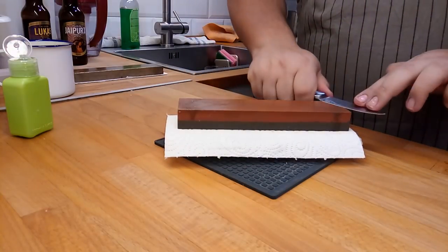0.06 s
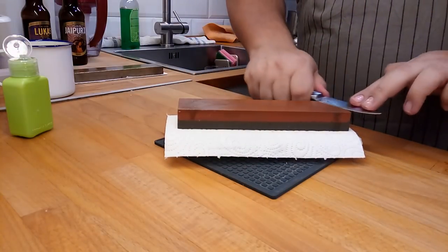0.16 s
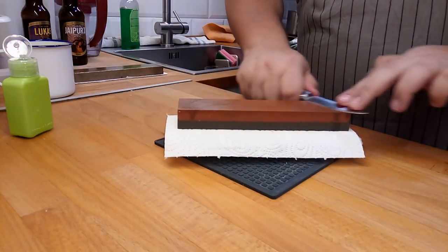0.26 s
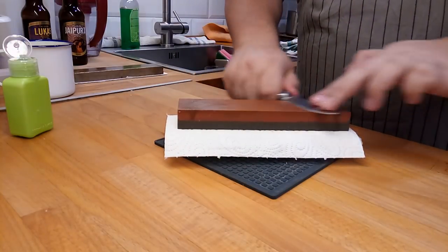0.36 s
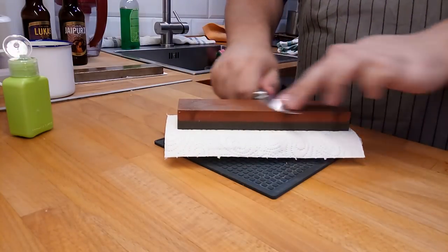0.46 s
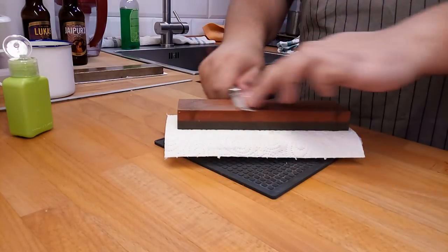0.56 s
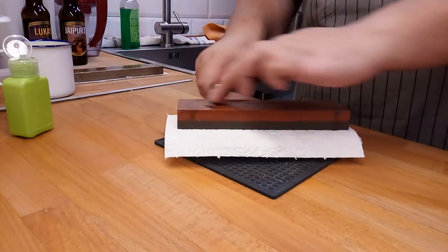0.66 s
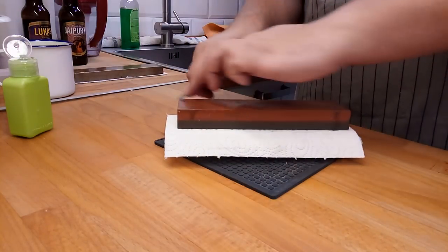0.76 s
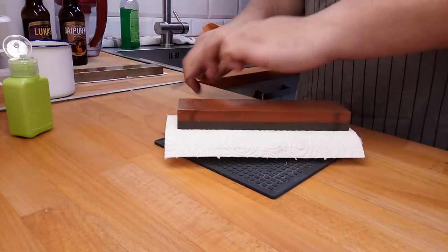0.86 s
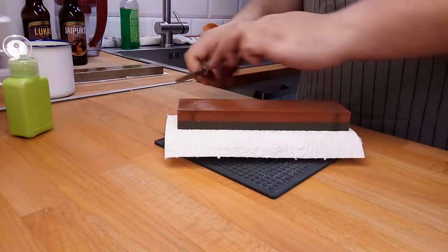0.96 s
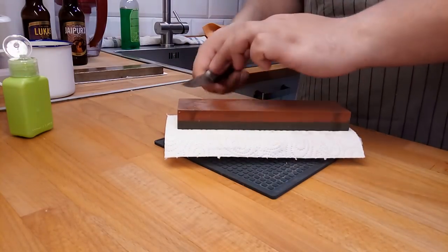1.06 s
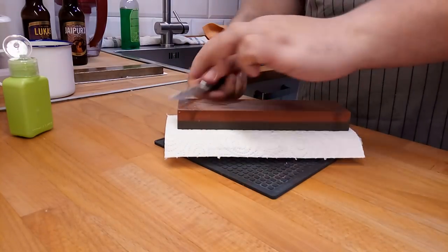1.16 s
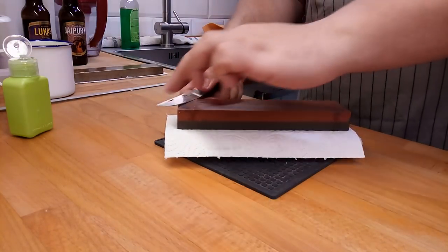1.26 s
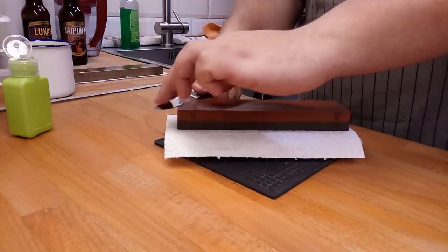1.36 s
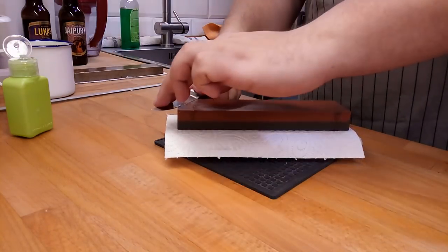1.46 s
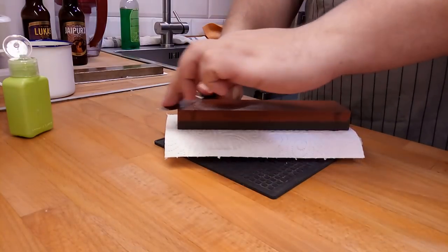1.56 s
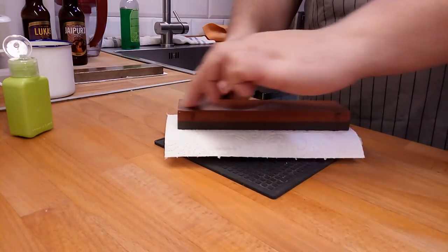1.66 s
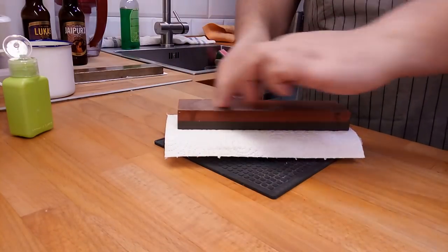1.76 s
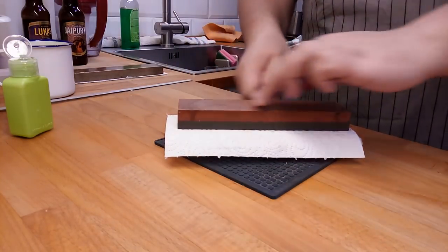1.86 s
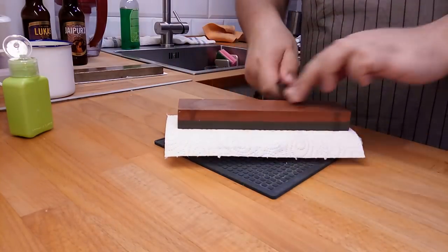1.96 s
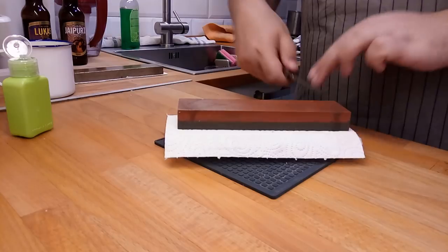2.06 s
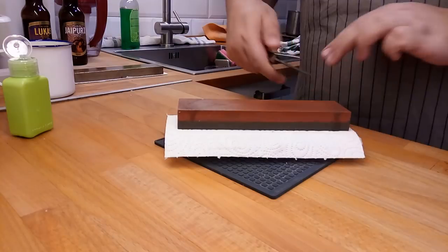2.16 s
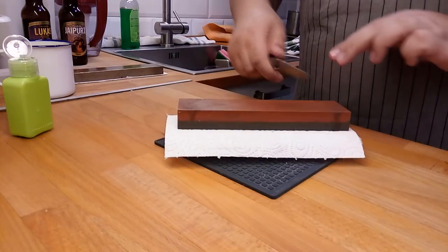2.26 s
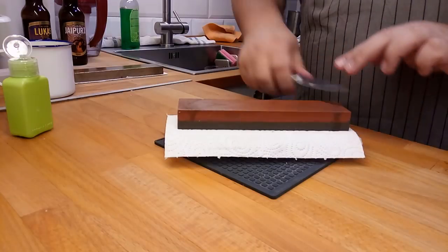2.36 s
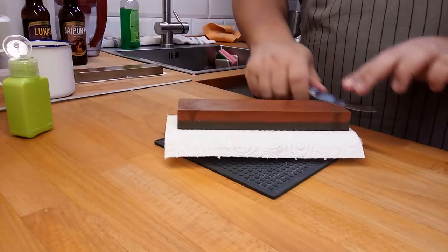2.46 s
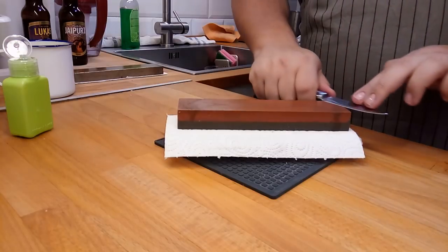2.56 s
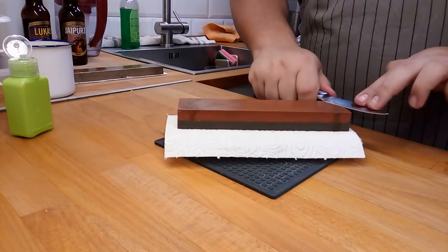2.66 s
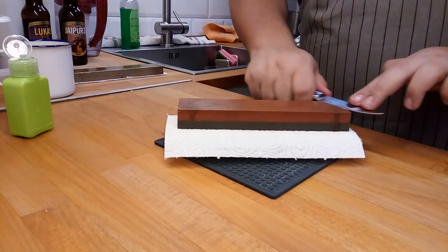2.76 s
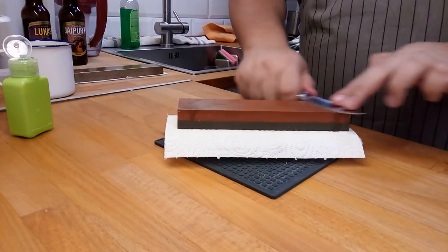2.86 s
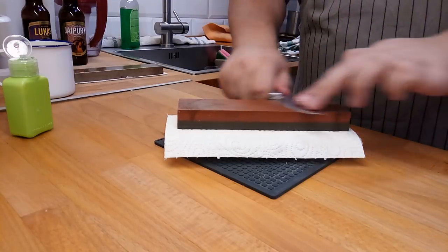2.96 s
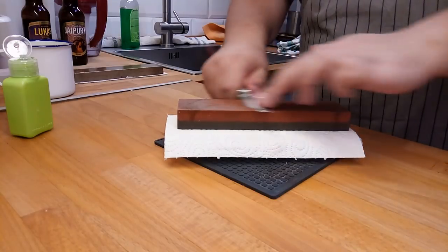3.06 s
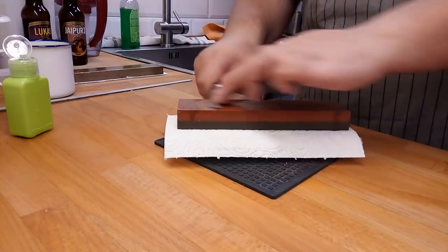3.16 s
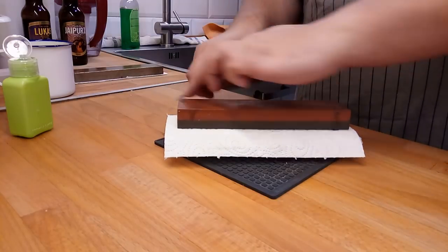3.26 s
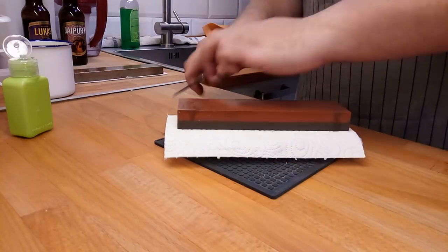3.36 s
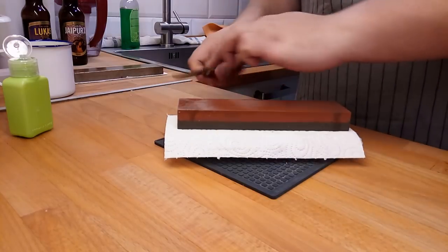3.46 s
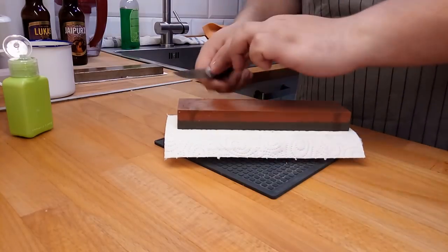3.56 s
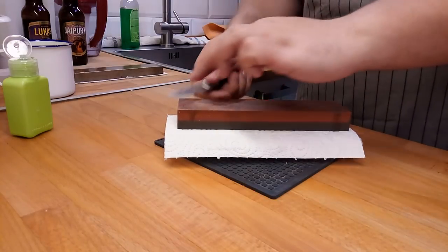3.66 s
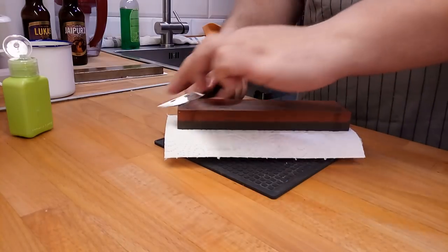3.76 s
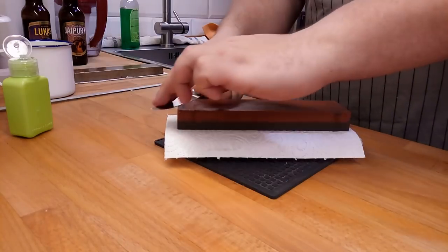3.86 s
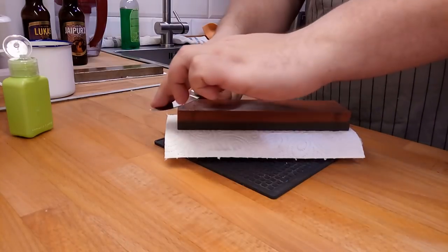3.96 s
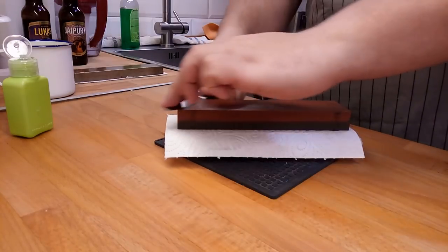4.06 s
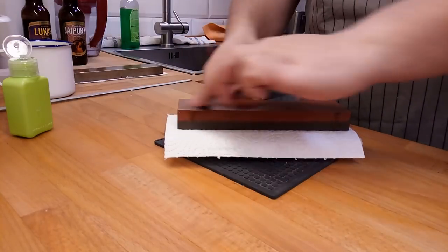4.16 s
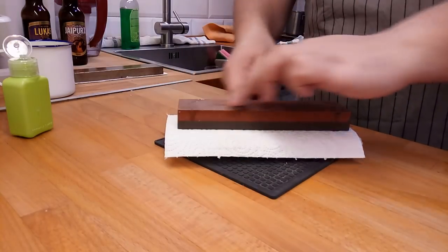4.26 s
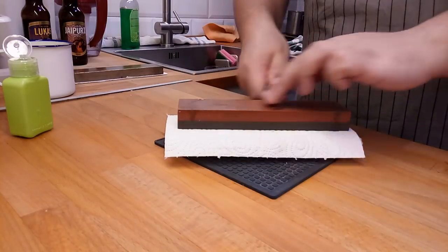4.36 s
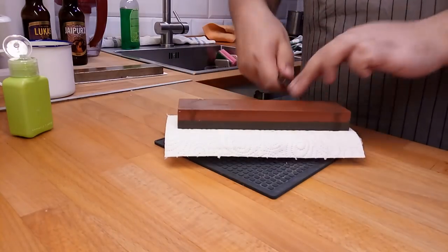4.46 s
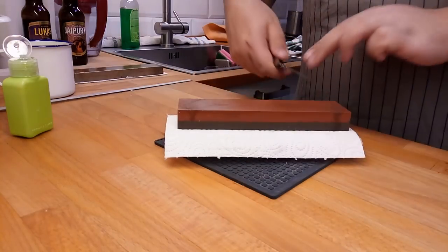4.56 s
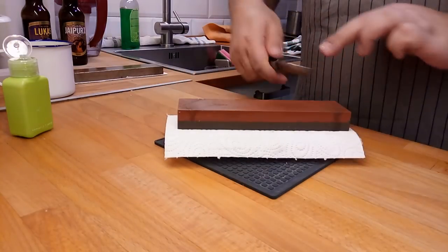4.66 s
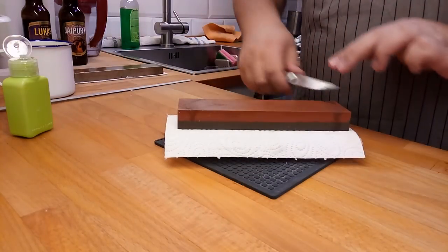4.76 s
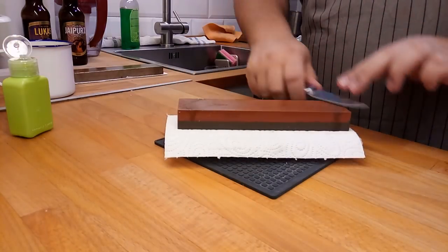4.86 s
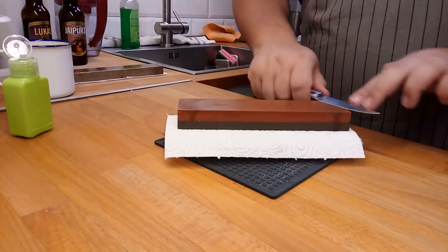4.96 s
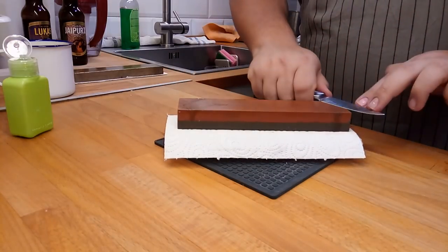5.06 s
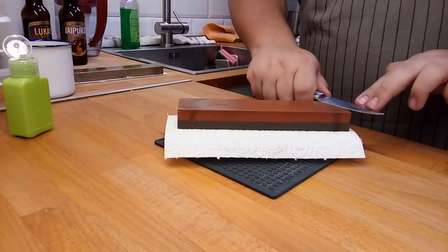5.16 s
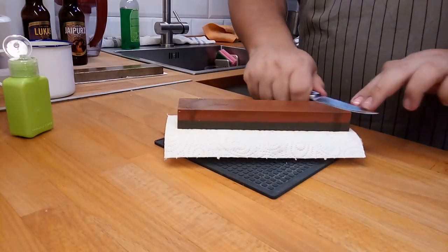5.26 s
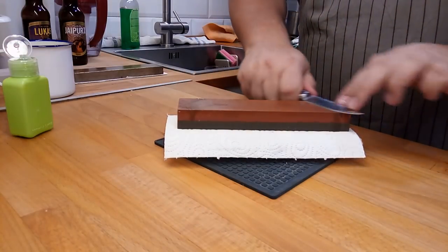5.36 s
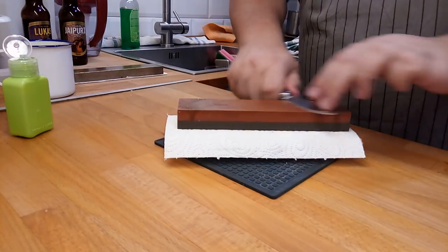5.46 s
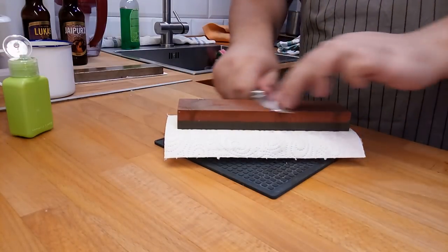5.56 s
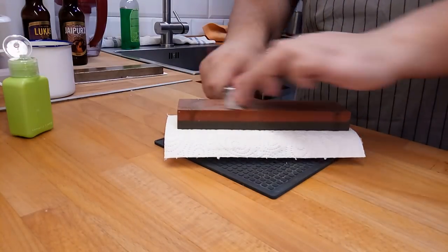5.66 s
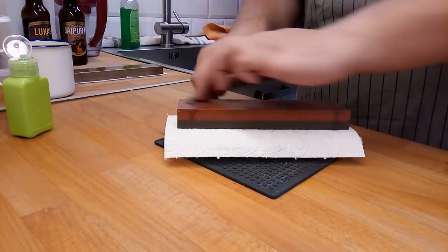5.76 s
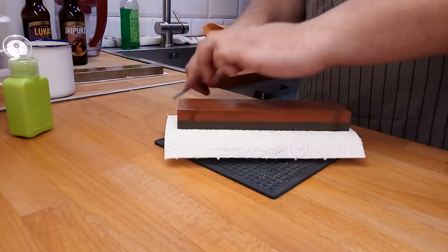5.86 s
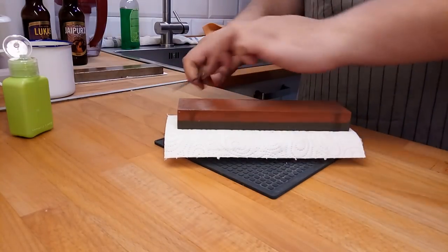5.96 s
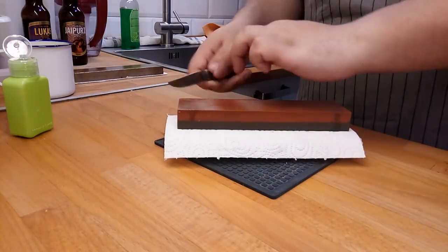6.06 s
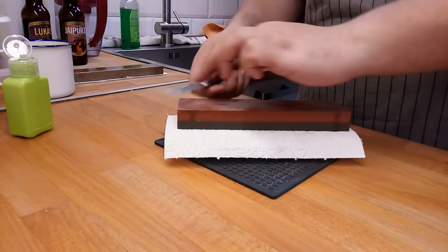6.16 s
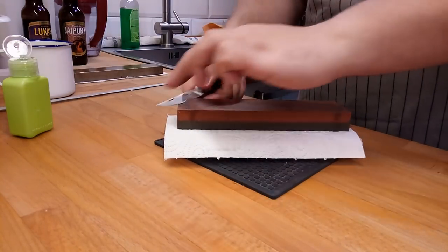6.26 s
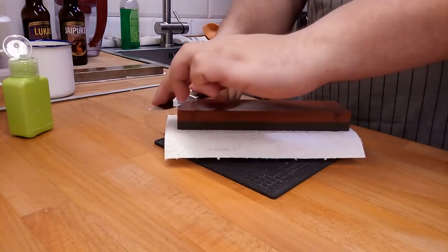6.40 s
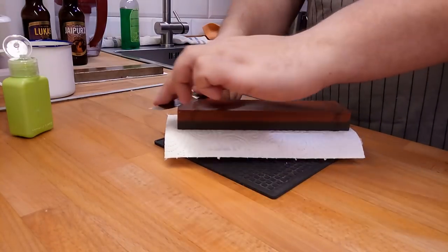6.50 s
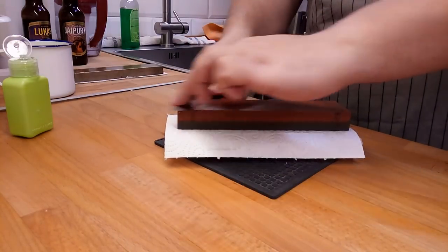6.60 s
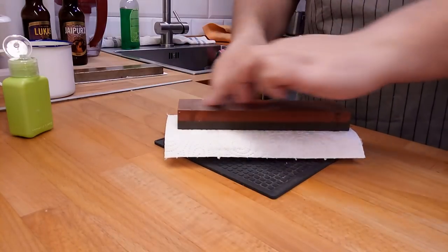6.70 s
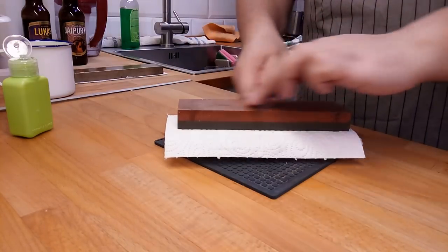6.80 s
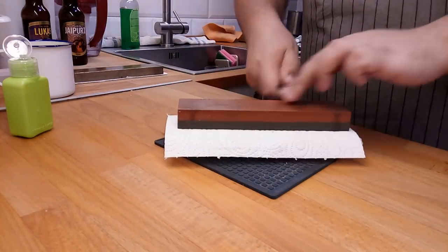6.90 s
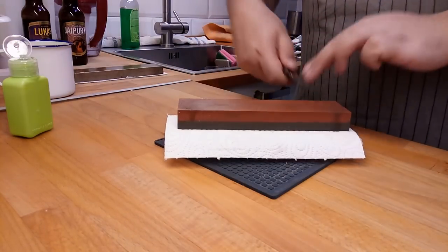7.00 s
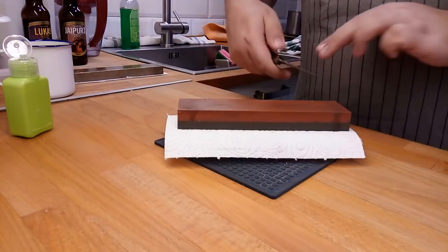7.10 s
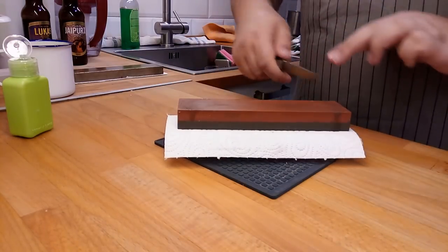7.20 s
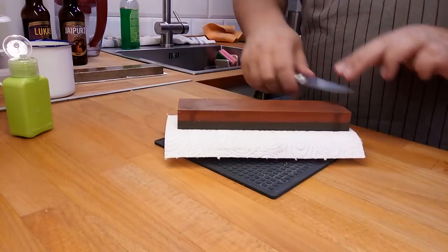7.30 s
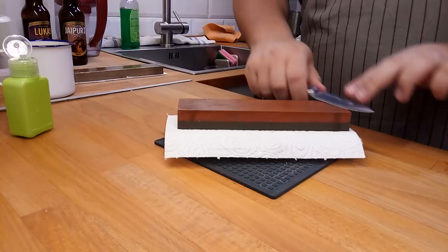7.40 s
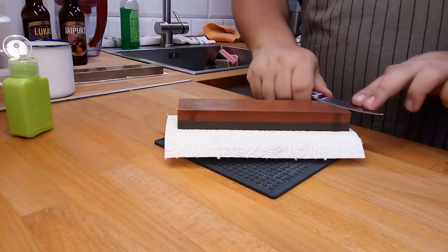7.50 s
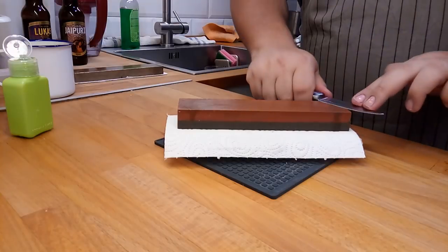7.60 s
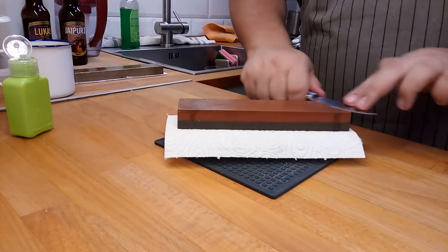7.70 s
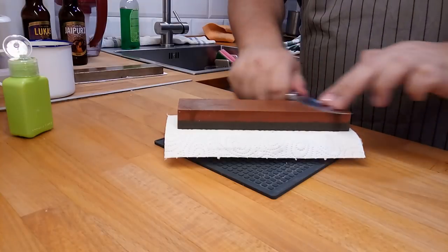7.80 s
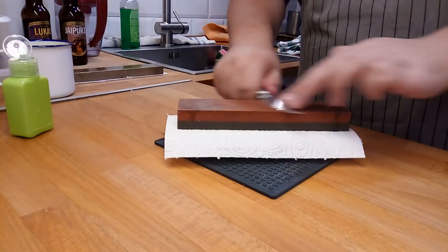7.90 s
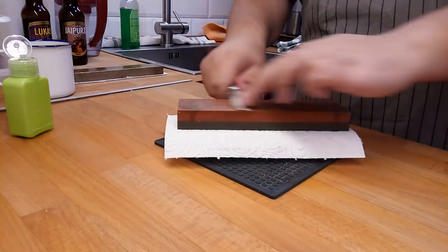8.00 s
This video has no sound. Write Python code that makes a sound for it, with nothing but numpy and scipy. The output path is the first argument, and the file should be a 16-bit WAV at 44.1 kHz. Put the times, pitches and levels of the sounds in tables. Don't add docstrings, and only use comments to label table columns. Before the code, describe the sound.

Bright, dry, sandy rasps of steel on stone come in unhurried rhythm, about one every second and a quarter. Each has two parts, a short slide and a longer sweeping draw, divided by a tiny stop with dull handle knocks. Little grit snaps and thin whistles colour the ends, then the tip flicks off with a tick and light ring. Close stereo microphones in a small hard-walled kitchen; soft low hum from the pressed counter and quiet room air.

```python
import sys
import numpy as np
from scipy import signal
from scipy.fft import rfft, irfft
from scipy.io import wavfile
from scipy.ndimage import uniform_filter1d, minimum_filter1d

SR = 44100
rng = np.random.default_rng(int(sys.argv[2]) if len(sys.argv) > 2 else 0)


def level_to_linear(level):
    exponent = np.asarray(level, float) / 20
    return 10 ** exponent


def log_audio(samples):
    frames = np.atleast_2d(samples).T
    limited = np.clip(frames, -1, 1)
    pcm = np.round(limited * 32767).astype(np.int16)
    wavfile.write(sys.argv[1], SR, pcm)


N = 354563

# pitch_hz, density_db [dB per Hz]
AIR_SPECTRUM = [(12, -41), (20, -10.5), (53, -37), (124, -16.5), (264, -19.5), (287, -16), (666, -37.5),
                (907, -19.5), (1010, -30), (2160, -38), (2350, -42.5), (8080, -42.5), (9840, -41.5),
                (15000, -40), (16300, -53)]
AIR_DB = -54
# pitch_hz, width_hz, level_db
COUNTER_MODES = [(87.5, 19, -7), (109.7, 23.2, 6), (133, 4.7, 0), (189.8, 21.4, -4.5)]
# pitch_hz, width_hz, level_db
BOARD_MODES = [(261.6, 68, 7), (312, 26.5, 6), (402.5, 27, 3), (515, 40.5, 6)]
# centre_s, drone_db, length_s
PUSHES = [(0.0, -34, 0.018), (0.35, -45, 0.48), (0.79, -45.5, 0.37), (1.43, -54.5, 0.32),
          (1.715, -43.5, 0.17), (1.98, -47, 0.23), (2.176, -47.5, 0.079), (2.646, -52, 0.23),
          (2.945, -44.5, 0.29), (3.252, -43, 0.14), (3.405, -40, 0.18), (4.236, -49, 0.29),
          (4.434, -44, 0.3), (5.21, -67, 0.12), (5.4, -46, 0.63), (5.895, -42.5, 0.27),
          (6.775, -50.5, 0.46), (7.006, -52.5, 0.24), (7.306, -55.5, 0.92), (7.781, -42, 0.14)]
REST_DB = -61.5
# stage [0-5], level_db
BOARD_LOAD = [(0, -66), (1.5, -66), (2.3, -55), (2.9, -56.5), (3.5, -48.5), (4.0, -60.5), (4.3, -67.5),
              (4.6, -78), (5, -69.5)]

# touch_s, stop_s, draw_s, roll_s, lift_s
PASSES = [
    (-0.12, 0.135, 0.15, 0.7, 0.875),
    (1.297, 1.55, 1.607, 2.0, 2.13),
    (2.564, 2.74, 2.765, 3.205, 3.373),
    (3.801, 4.045, 4.062, 4.44, 4.577),
    (4.981, 5.2, 5.26, 5.765, 5.91),
    (6.341, 6.535, 6.583, 6.925, 7.06),
    (7.495, 7.665, 7.68, 8.06, 8.22),
]
# slide_db, mid_slide_sag_db, pause_db, draw_db, belly_db
EFFORT = [(-34, 0.5, -55, -34.5, -35), (-37.5, -8.5, -63, -35.5, -34.5), (-38.5, 4, -98, -34, -34.5),
          (-37.5, 1, -72, -36.5, -36.5), (-32.5, -1.5, -55.5, -35.5, -36), (-36.5, -1.5, -79, -35.5, -35),
          (-39.5, -0.5, -69, -34, -36)]
# slide_dullness_db, belly_ring_db, lower_resonance_db, upper_resonance_db, board_load_db
GRIP = [(0.83, -3, -1, 5, 3), (0.011, -7, -1.5, 1.5, 1.5), (0.8, 2, 2.3, 0, -1), (0.21, -8.5, 0, 2.5, 0),
        (0.74, -1.5, 2, 0, -2.5), (0.27, -10, 1, -3, -2), (1.8, -2, 0.5, 5, -7)]
# touch_hz, stop_hz, level_db, sizzle_hz
SLIDE_ARCS = [(4650, 4100, -13.5, 19000), (4430, 3630, -1, 9100), (7200, 5000, -40, 22000),
              (4640, 4340, -23, 10700), (4830, 10000, -27, 9000), (5240, 5300, -15, 11000),
              (3400, 3200, -21, 16000)]
SLIDE_SIZZLE_DB = [3, 2.5, 2, -2, -9, 2.5, 0]
# brake_s, loss_by_then_db, sudden_drop_db
BRAKES = [(0.06, -7, 1.5), (1.487, -3.5, -14), (2.671, -7, -14), (3.998, -3, -19), (5.105, -6.5, 0.5),
          (6.483, -2.5, -18), (7.61, -8.5, -6)]
SOFT_START_DB = [-0.5, -1.5, -8.5, -6, -1, -2.5, -1.5]
BRAKE_S, RELEASE_S = 0.0055, 0.014
JERK_DB = [-11.5, -5.5]
SPEED_UP_S = [0.11, 0.044]
JERK_S, EARLY_DB = 0.009, -1.5
LET_UP_S, LET_UP_DB = 0.029, -4

# pitch_hz, density_db [dB per Hz]
GRIT_SPECTRUM = [(350, -50), (600, -73), (670, -23.5), (1120, -18), (2460, -15), (2820, -10.5), (3520, -11),
                 (4700, -4.5), (5550, -2), (8280, -11), (10900, 0), (13900, 0), (14900, 2.5), (15600, 5),
                 (16300, -54)]
# pitch_hz, left_minus_right_db
STEREO_TILT = [(600, -10), (1300, 4.5), (2500, 0.5), (5000, 3), (8000, 4.5), (10500, 10.5), (12500, 2.5),
               (15000, -3)]
# stage [0-5], then over the sizzle rasp_db, scrape_db, free_ring_db
EDGE_PART = [(0, -1.5, -25, -13.5), (0.6, -3, -17, -17), (1.5, -3.5, 1.5, -66), (2.25, -3.5, -22, -20),
             (2.65, -8.5, -24, -12.5), (2.969, -7, -20.5, -17.5), (3.121, -4, -17.5, -11.5),
             (3.699, -4, -18, -2.5), (4.0, 0, -30.5, -7.5)]
# stage [0-5], lower_hz, lower_db, upper_hz (not used),
# upper_db (before the draw only)
CONTACT = [(0, 4800, -28, 10800, 14), (1.5, 5470, -20, 11100, 4), (2.0, 5700, -14, 11300, 7.5),
           (2.4, 5500, 6.5, 11080, 14), (2.72, 6310, 26, 11800, 12), (2.88, 7150, 21, 10920, 9),
           (2.95, 7200, 23, 8930, 5.5), (2.99, 7400, -15, 9000, -3), (3.0, 5000, -10, 10000, -10),
           (3.04, 5200, 18, 10100, -5), (3.45, 6710, 22, 10700, 10), (3.85, 5850, -6, 11270, 7)]
# at_s, pitch_hz, level_db
ARCHES = [
    [(.15, 11000, 0), (.3, 11200, -9), (.42, 10500, -3), (.57, 12400, 12), (.62, 11100, 4),
     (.655, 10040, 13), (.68, 9000, 8), (.715, 7400, 6), (.74, 6800, -8)],
    [(1.61, 11300, 14), (1.72, 11020, 14.5), (1.83, 11150, 17.5), (1.9, 12000, 8), (1.93, 11600, 8),
     (1.95, 10300, 11), (1.975, 8800, 7), (2.01, 6860, 13.5), (2.04, 6200, -5)],
    [(2.77, 10940, 0), (2.9, 11300, 2), (2.97, 10700, 8.5), (3.03, 11760, 14), (3.09, 12700, 10),
     (3.14, 12050, 9), (3.165, 10400, 11), (3.2, 9000, 9), (3.23, 7540, -17)],
    [(4.06, 11900, 9), (4.15, 11500, 17.5), (4.2, 10800, 13.5), (4.26, 11360, 13), (4.33, 11800, 15),
     (4.37, 10800, 16), (4.4, 9400, 8), (4.43, 7500, 3), (4.47, 6260, -5)],
    [(5.26, 10400, 6), (5.38, 11160, 11.5), (5.48, 11100, 14), (5.55, 11850, 13), (5.64, 12000, 14),
     (5.69, 11800, 9), (5.75, 9200, 12), (5.785, 7800, 12), (5.81, 7000, -8)],
    [(6.58, 11900, 12), (6.66, 11100, 13), (6.79, 11360, 13.5), (6.84, 12000, 17), (6.875, 11300, 13),
     (6.9, 10400, 10), (6.925, 8700, -1), (6.95, 7200, 2), (6.97, 6500, -10)],
    [(7.68, 10900, 6), (7.72, 11000, 1), (7.85, 10770, 11), (7.92, 11400, 10), (7.97, 12700, 7),
     (8.04, 12200, -2)],
]
HEEL_DB = [-4, -9]
TIP_DB = [-3, -4.5]
# pitch_hz, level_db, t60_s
BLADE_MODES = [(2822, -9.5, .2), (4430, -20, .14), (5507, 3, .12), (7181, -18, .12), (9600, -25, .4),
               (10970, -11, .1)]
HELD_DAMPING = .4
CROSS_SAMPLES, CROSS_DB = 3.5, 0.55

# pitch_hz, t60_s
KITCHEN_DECAY = [(300, 0.099), (1000, 0.79), (3000, 0.63), (6000, 0.41), (12000, 0.35)]
# pitch_hz, level_db
WALL_RETURN = [(400, -4.5), (1500, -3.5), (2500, 0.5), (4000, 0), (12000, -1)]

# start_s, peak_db, ring_share [ratio]
TOUCHES = [(0.154, -33, 0.17), (0.167, -40, 0.1), (0.196, -30, 0.27), (0.871, -29, 0.19),
           (1.031, -35, 0.05), (1.16, -58, 0.23), (1.2947, -19, 0.048), (1.473, -22.5, 0.041),
           (1.515, -26, 0.067), (1.5708, -25, 0.042), (1.609, -25.5, 0.14), (2.129, -17.5, 0.042),
           (2.5648, -23.5, 0.78), (3.3728, -30, 0.72), (3.799, -26.5, 0.09), (4.067, -52, 0.18),
           (4.574, -22.5, 0.064), (4.978, -35, 0.41), (5.833, -24, 0.35), (5.909, -34, 1),
           (6.139, -47.5, 0.33), (6.337, -23, 0.085), (6.584, -24, 0.088), (7.0565, -20, 0.032),
           (7.4945, -26, 0.45), (7.6779, -53, 0.41)]
LIFTS = [.875, 2.13, 3.373, 4.577, 5.91, 7.06]
# centre_s, length_s, from_hz, to_hz, level_db
SKIDS = [(.6, .1, 15100, 14700, -39), (0.821, .05, 10400, 11600, -36), (0.733, .1, 10100, 10200, -51),
         (1.98, .07, 14300, 15300, -47), (2.03, .05, 12700, 13100, -49), (2.082, .06, 11200, 10700, -39),
         (2.1, .07, 14500, 15500, -47), (2.135, .03, 12500, 13400, -48), (3.203, .1, 10300, 10400, -46),
         (3.335, .05, 10400, 11300, -38), (3.28, .05, 14000, 14800, -47), (4.42, .07, 14500, 15200, -42),
         (4.53, .05, 14300, 14820, -39), (4.523, .08, 10900, 10900, -39), (5.443, .12, 15200, 15000, -36),
         (5.72, .06, 14600, 15200, -32), (5.87, .06, 9800, 11200, -39), (5.885, .04, 15000, 15200, -47),
         (6.92, .07, 14600, 15000, -41), (6.984, .08, 12900, 12900, -43), (7.02, .05, 14600, 15100, -49.5),
         (7.03, .08, 11300, 10800, -41), (8.0, .08, 14900, 15200, -46)]
# start_s, peak_db
CATCHES = [(0.822, -27), (1.8724, -38), (1.9176, -28), (2.024, -29), (2.0712, -23), (3.335, -32),
           (3.8262, -30), (4.1355, -34), (4.1918, -23.5), (4.3003, -22.5), (4.4296, -28), (5.3816, -29),
           (5.5112, -27), (5.7184, -18.5), (5.769, -19), (5.87, -21), (6.7549, -20.5), (6.8134, -27.5),
           (6.922, -34), (6.9663, -33)]
# centre_s, length_s, pitch_hz, width_hz
BRUSHES = [(1.12, 0.3, 2820, 90), (1.21, .12, 4400, 120), (1.2, .14, 9600, 60), (1.22, .12, 2100, 120),
           (1.24, .12, 3100, 100), (1.43, .1, 1200, 70), (1.4, .14, 2820, 70), (3.58, .1, 2850, 90),
           (3.74, 0.12, 4400, 200), (3.7, 0.14, 9600, 60), (4.94, 0.09, 2600, 1500), (4.88, .12, 9600, 60),
           (4.95, .05, 3000, 200), (6.24, .14, 9550, 60), (7.3, .3, 3500, 2500), (7.45, .08, 9500, 60),
           (2.35, .2, 3000, 2000), (1.036, .02, 3500, 3000), (3.93, .17, 5550, 120), (4.82, .2, 3200, 900)]
BRUSH_DB = [-70, -69.5, -80, -72, -76, -59, -59, -78, -71, -82, -67, -85, -72, -83, -65, -80, -78, -59, -52,
            -67]
# start_s, peak_db, pitch_hz
KNOCKS = [(1.032, -49, 788), (1.496, -41.5, 890), (2.562, -31.5, 1510), (2.663, -28.5, 1660),
          (2.816, -45, 1570), (3.864, -60, 2200), (3.9919, -33.5, 970), (3.9929, -37.5, 1880),
          (4.139, -58, 2270), (4.977, -46, 1200), (5.099, -33, 1640), (6.337, -54, 1620), (6.48, -33, 1160),
          (6.586, -45, 2160), (7.493, -41.5, 850), (7.708, -47, 1900)]

# pitch_hz, level_db
GATE_DB = [(1900, -40), (2300, -3), (3100, -1), (3500, -1.2), (4700, -.3), (5200, -3), (6300, -5),
           (7000, -2), (8600, -1.3), (9500, -6), (12000, -5.5), (13000, -6), (13800, -2.5), (14600, -7)]
BAND_BINS = 7
EDGE_HZ = 15620


def evened(x):
    return x / np.sqrt(np.mean(x ** 2) + 1e-20)


def read(points, hz):
    f, value = np.transpose(points)
    return np.interp(np.log(hz + 1), np.log(f + 1), value)


def colour(x, db_of_hz):
    size = x.shape[-1]
    return irfft(rfft(x) * level_to_linear(db_of_hz(np.fft.rfftfreq(size, 1 / SR))), size)


def band(x, lo_hz, hi_hz):
    edges_hz = [lo_hz, min(hi_hz, .49 * SR)]
    return signal.sosfilt(signal.butter(N=3, Wn=edges_hz, btype="band", fs=SR, output="sos"), x)


def resonate(x, hz, width):
    turn = np.exp(2j * np.pi * np.cumsum(hz * np.ones(x.shape[-1])) / SR)
    r = np.exp(-np.pi * width / SR)
    return 2 * (turn * signal.lfilter([1 - r], [1, -r], x / turn + 1e-18)).real


def wobble(shape, span_s):
    size = max(round(span_s * SR), 1)
    smooth = uniform_filter1d(rng.standard_normal(shape), size)
    return evened(uniform_filter1d(smooth, size))


def add(mix, s, sound):
    part = mix[..., round(s * SR):][..., :sound.shape[-1]]
    part += sound[..., :part.shape[-1]]


def patchy(x, patch_db):
    z = signal.stft(x, nperseg=256)[2]
    spots = rng.standard_normal(z.shape[::-1]).T
    spots = uniform_filter1d(spots, size=4, axis=1)
    for _ in range(2):
        spots = uniform_filter1d(spots, size=14, axis=2)
    return signal.istft(z * level_to_linear(patch_db * evened(spots)), nperseg=256)[1][:, :x.shape[-1]]


def hush():
    shared, *own = rng.standard_normal((3, N))
    own = np.array(own)
    air = band(shared, 23, 500) + 0.61 * own + 0.25 * band(own, 1120, 24000)
    return level_to_linear(AIR_DB - 7.0) * evened(colour(patchy(air, patch_db=3.5), lambda hz: read(AIR_SPECTRUM, hz)))


def stage(t):
    times = np.ravel(PASSES)
    return np.interp(t, times, np.arange(len(times))) % len(PASSES[0])


def modes(shared, own, table):
    force = shared + own
    return sum(level_to_linear(db) * resonate(resonate(force, hz, w), hz, 2 * w) / np.sqrt(w) for hz, w, db in table)


def counter():
    t = np.arange(N) / SR
    coarse = t[::100]
    power = level_to_linear(2 * REST_DB) + sum(level_to_linear(2 * db - 64.0 * ((coarse - s) / length) ** 2)
                                   for s, db, length in PUSHES)
    lean = np.interp(t, coarse, np.sqrt(power))
    draws = [(go + lift) * .5 for _, _, go, _, lift in PASSES]
    load_db = np.interp(stage(t), *np.transpose(BOARD_LOAD))
    load = level_to_linear(load_db + np.interp(t, draws, np.transpose(GRIP)[-1]))
    shared, *own = rng.standard_normal((3, N)) * level_to_linear(2.6 * wobble(N, 0.017))
    own = np.array(own)
    low = modes(shared, 0.12 * own, COUNTER_MODES)
    high = modes(shared, 0.5 * own, BOARD_MODES)
    return (lean * evened(low) + load * evened(high)) * level_to_linear(np.array([[.6], [-.6]]))


def speed(t, times, effort, way, braking):
    touch, stop, go, roll, lift = times
    slide_db, sag_db, pause_db, draw_db, belly_db = effort
    brake, loss_db, drop_db, soft_db = braking
    slowed_db = slide_db + loss_db
    ease = lift - LET_UP_S
    eased_db = belly_db + LET_UP_DB
    at = [touch, touch + 0.62 * (brake - touch), brake, brake + BRAKE_S, stop,
          go, go + JERK_S, go + SPEED_UP_S[way], roll,
          roll + 0.0078, ease, ease + 0.02, lift - 0.006, lift]
    db = [slide_db, slide_db + sag_db, slowed_db, slowed_db + drop_db, pause_db,
          pause_db, draw_db + JERK_DB[way] + soft_db, draw_db + EARLY_DB, draw_db,
          belly_db, belly_db, eased_db, eased_db, belly_db]
    return np.interp(t, at, db)


def ring(shake, damping):
    drive = np.r_[shake, np.zeros(SR // 3)]
    bend = 1 + .0007 * wobble(len(drive), .03)
    out = 0
    for hz, db, t60 in BLADE_MODES:
        decay = t60 * damping
        out = out + level_to_linear(db) * resonate(drive, hz * bend, 2.2 / decay) * np.sqrt(SR * decay / 14)
    return out


def grind(place):
    size = len(place)
    bursts = np.minimum(rng.exponential(1, (3, size)), 4)
    grains = rng.standard_normal((3, size)) * level_to_linear(2 * bursts)
    late = np.arange(size) + np.round(CROSS_SAMPLES * place).astype(int)
    late = np.clip(late, 0, size - 1)
    shared = np.array([grains[0], grains[0][late]])
    chatter = level_to_linear(1.3 * wobble(size, .003) + .6 * wobble(size, .015))
    return grains[0], evened(patchy((1.2 * shared + grains[1:]) * chatter, patch_db=3.5))


def stroke(times, effort, grip, way, arc, slide_db, braking, arch):
    start, end = times[0], times[-1] + RELEASE_S
    t = np.arange(max(start, 0), min(end, N / SR), 1 / SR)
    size, now = len(t), stage(t)
    sliding = np.clip(2 - now, 0, 1)
    speed_db = speed(t, times, effort, way, braking)
    at, *parts = np.transpose(EDGE_PART)
    rasp_db, scrape_db, free_db = (np.interp(now, at, c) for c in parts)
    dull_db = grip[0] * sliding

    at, *bends = np.transpose(CONTACT)
    low_hz, low_db, high_hz, high_db = (np.interp(now, at, c) for c in bends)
    at, arch_hz, arch_db = np.transpose(arch)
    drawn = t > times[2]
    arch_hz = np.interp(t, at, arch_hz) * (1 + 0.0075 * wobble(size, 0.013))
    high_hz = np.where(drawn, arch_hz, arc[3])
    high_db = np.where(drawn, np.interp(t, at, arch_db), high_db + grip[3])
    low_db = low_db + np.where(t < times[3], HEEL_DB[way], TIP_DB[way])

    place = (1 - 2 * way) * np.interp(now, [2, 4], [1, -1])
    shaking, grit = grind(place)
    tilt = np.outer([.5, -.5], [1])
    tone = evened(colour(grit, lambda hz: read(GRIT_SPECTRUM, hz) + tilt * read(STEREO_TILT, hz)))
    lower = resonate(resonate(tone, low_hz, 550), low_hz, 1100)
    lower = lower * level_to_linear(low_db + grip[2] - 11.0 + 2 * wobble(size, 0.04))
    upper = np.array([resonate(resonate(x, k * high_hz, 340), k * high_hz, 800)
                      for x, k in zip(grit, [1, 1.03])])
    upper_gain = level_to_linear(high_db + slide_db * sliding - 4.0 + 2.4 * wobble(size, 0.037))
    slid = level_to_linear(arc[2]) * sliding * 4 * resonate(tone, np.interp(now, [0, 1], arc[:2]), 166)

    rasp = evened(band(tone, 2700, 8200) + lower + slid)
    sizzle = evened(evened(band(tone, 8450, 17500)) + upper_gain * 2 * upper)
    scrape = evened(band(tone, 744, 2207))
    edge = level_to_linear(rasp_db + dull_db) * rasp + level_to_linear(-dull_db) * sizzle + level_to_linear(scrape_db) * scrape

    contact = np.clip(t - start, 0, .0015) / 0.0013 * np.clip((end - t) / 0.017, 0, 1)
    shake = contact * evened(shaking) * level_to_linear(speed_db + free_db)
    belly = np.clip(3 * (now - 3.2), 0, 1)
    blade = ring(shake * (1 - belly), HELD_DAMPING) + ring(shake * belly * level_to_linear(grip[1]), 0.94)
    sound = blade * level_to_linear([[-2.2], [-4.4]])
    add(sound, 0, edge * contact * level_to_linear(speed_db + CROSS_DB * np.outer([-1, 1], place)))
    return t[0], sound


def kitchen(x):
    taps = np.zeros((2, SR))
    at = np.arange(300, SR - 20, 20) + rng.integers(0, 20, (2, (SR - 301) // 20))
    np.put_along_axis(taps, at, rng.choice([-1., 1.], at.shape), 1)
    hz, t, z = signal.stft(taps, SR, nperseg=256)
    decay = level_to_linear(-60 * t / read(KITCHEN_DECAY, hz)[:, None])
    tail = signal.istft(z * decay, SR, nperseg=256)[1]
    return signal.fftconvolve(x, tail / np.linalg.norm(tail[0]), axes=1)[:, :N]


def touches():
    out, t = np.zeros((2, N)), np.arange(SR // 5) / SR
    for s, db, ring_share in TOUCHES:
        damping = .9 if min(abs(s - np.array(LIFTS))) < .02 else .12
        struck = sum(level_to_linear(mode_db - 60 * t / (damping * t60)) * np.sin(2 * np.pi * hz * t)
                     for hz, mode_db, t60 in BLADE_MODES)
        crack = evened(colour(rng.standard_normal((2, len(t))), lambda hz: read(GRIT_SPECTRUM, hz)))
        crack = crack * level_to_linear(-60 * t / 0.12) * np.minimum(t / 0.002, 1)
        add(out, s, level_to_linear(db) * (0.29 * crack + abs(ring_share) * struck))
    return out


def skids():
    out = np.zeros((2, N))
    for s, length, from_hz, to_hz, db in SKIDS:
        size = min(round(length * SR), 8000)
        shared, *own = rng.standard_normal((3, 8000))[:, :size]
        hz = np.linspace(from_hz, to_hz, size)
        whistle = evened(resonate(resonate(shared + np.array(own), hz, 350), hz, 700))
        add(out, s - length / 2, level_to_linear(db) * whistle * np.hanning(size))
    return out


def catches():
    out, t = np.zeros((2, N)), np.arange(SR // 20) / SR
    for s, db in CATCHES:
        snag = evened(colour(rng.standard_normal((2, len(t))), lambda hz: read(GRIT_SPECTRUM, hz)))
        add(out, s, level_to_linear(db - 6.5 - 60 * t / 0.063) * snag * np.minimum(t / 0.0027, 1))
    return out


def brushes():
    out = np.zeros((2, N))
    for (s, length, hz, width), db in zip(BRUSHES, BRUSH_DB):
        size = round(length * SR)
        noise = rng.standard_normal((2, 16000))
        fuzz = evened(resonate(resonate(noise, hz, width), hz, 2 * width))[:, :size]
        add(out, s - length / 2, level_to_linear(db) * fuzz * np.hanning(size)[:fuzz.shape[1]])
    return out


def knocks():
    out, t = np.zeros((2, N)), np.arange(SR // 10) / SR
    for s, db, hz in KNOCKS:
        mode = -np.sin(2 * np.pi * hz * t) * level_to_linear(-60 * t / 0.011)
        thud = -np.sin(2 * np.pi * 560 * t) * level_to_linear(-60 * t / 0.028)
        puff = evened(band(rng.standard_normal((2, len(t))), 270, 5900)) * level_to_linear(-60 * t / 0.067)
        add(out, s + 0.001072, level_to_linear(db) * (0.75 * mode + 0.044 * thud + 0.35 * puff))
    return out


def scene():
    knife = touches() + skids() + catches() + brushes() + knocks()
    for k, (times, effort, grip, arc) in enumerate(zip(PASSES, EFFORT, GRIP, SLIDE_ARCS)):
        braking = (*BRAKES[k], SOFT_START_DB[k])
        add(knife, *stroke(times, effort, grip, k % 2, arc, SLIDE_SIZZLE_DB[k], braking, ARCHES[k]))
    walls = kitchen(colour(knife, lambda hz: read(WALL_RETURN, hz)))
    return level_to_linear(1.5) * knife + level_to_linear(-4.5) * walls + counter() + hush()


def gated(x):
    hz, _, z = signal.stft(x, SR, window="cosine", nperseg=2048, noverlap=1024)
    power = uniform_filter1d((abs(z) ** 2).sum(0), size=2, axis=1)
    whole = len(hz) // BAND_BINS * BAND_BINS
    bands = power[:whole].reshape(-1, BAND_BINS, power.shape[1]).mean(axis=1).repeat(BAND_BINS, axis=0)
    around = np.exp(uniform_filter1d(np.log(bands + 1e-24), size=49, axis=0))
    waver = rng.standard_normal((power.shape[1], whole // BAND_BINS)).T
    waver = evened(uniform_filter1d(waver, size=2, axis=1)).repeat(BAND_BINS, axis=0)
    limit_db = read(GATE_DB, hz[:whole])[:, None] - .6 + 2.1 * waver
    quiet = power.sum(0) < 0.03 * power.sum(0).mean()
    limit_db -= 2.5 * np.outer(hz[:whole] < 7500, quiet)
    keep = np.ones(power.shape)
    keep[:whole] = bands > around * level_to_linear(2 * limit_db)
    keep = minimum_filter1d(keep, size=2, axis=1)
    total = (abs(z[:, 100:]) ** 2).sum(axis=(0, 1))
    attack = total > 10 * minimum_filter1d(total, size=3, origin=1)
    keep[:, attack | np.roll(attack, -1)] = 1
    return signal.istft(z * keep, SR, window="cosine", nperseg=2048, noverlap=1024)[1][:, :N]


def top_cut(x):
    return signal.sosfilt(signal.butter(12, 16810, fs=SR, output="sos"), x)


def record(dry):
    low_pass = signal.firwin(301, EDGE_HZ, window=("kaiser", 7), fs=SR)
    limited = signal.oaconvolve(gated(dry), low_pass[None], "same")
    return top_cut(limited)


dry = scene()
out = record(dry)
log_audio(out)
```